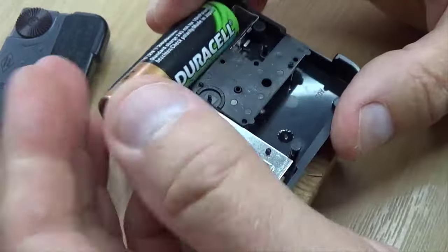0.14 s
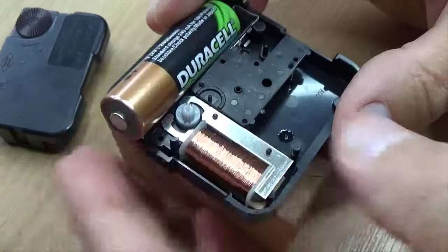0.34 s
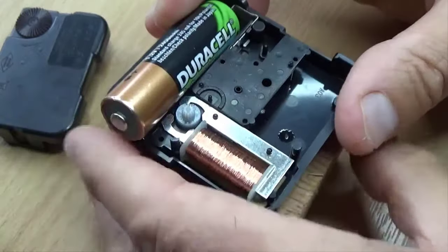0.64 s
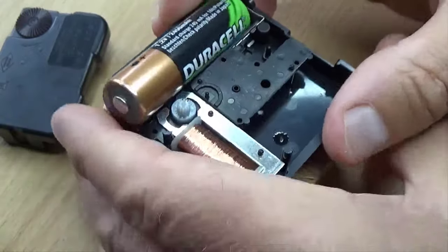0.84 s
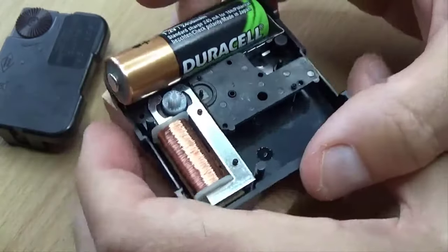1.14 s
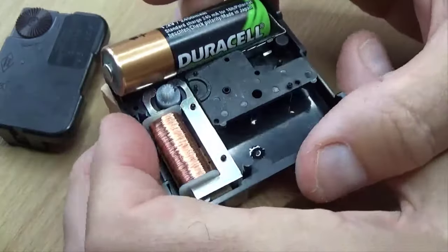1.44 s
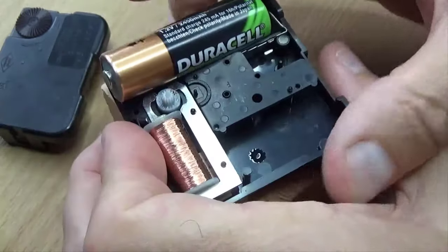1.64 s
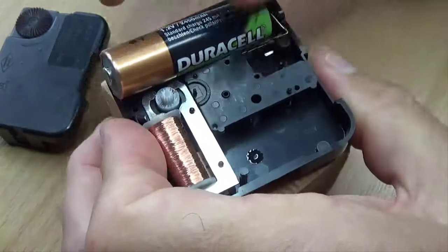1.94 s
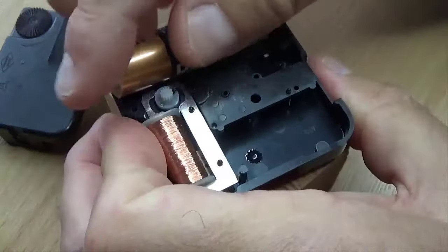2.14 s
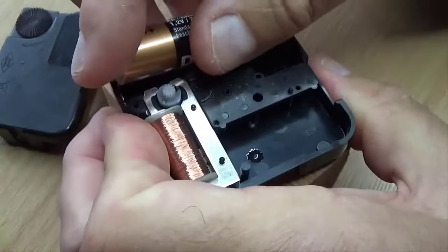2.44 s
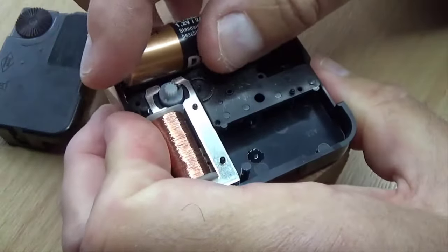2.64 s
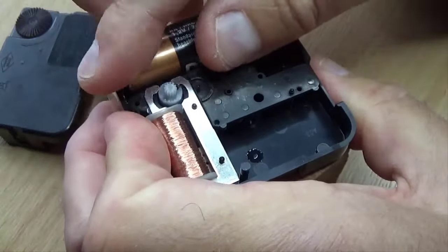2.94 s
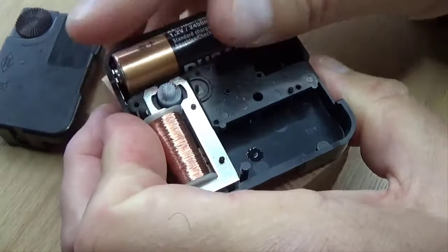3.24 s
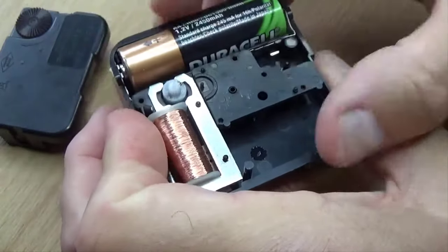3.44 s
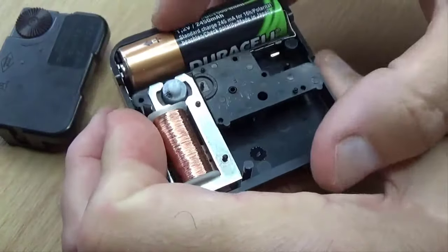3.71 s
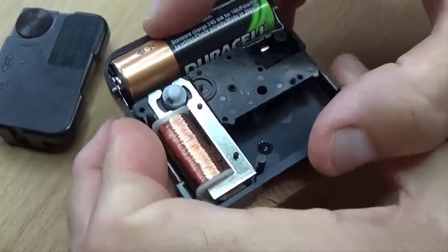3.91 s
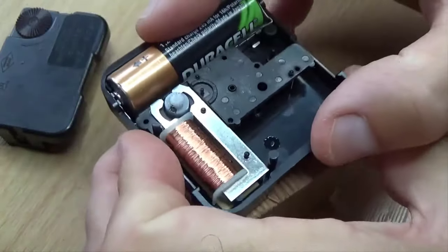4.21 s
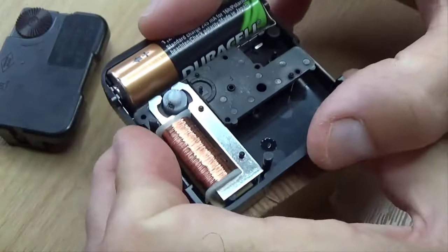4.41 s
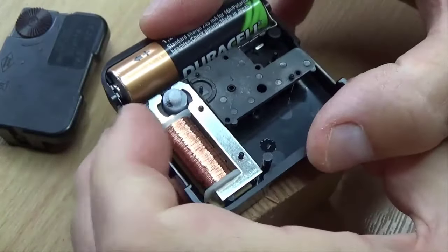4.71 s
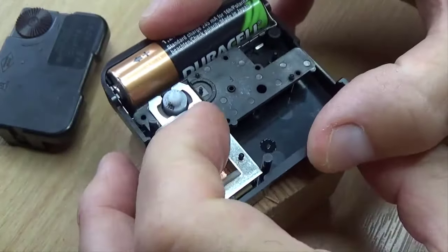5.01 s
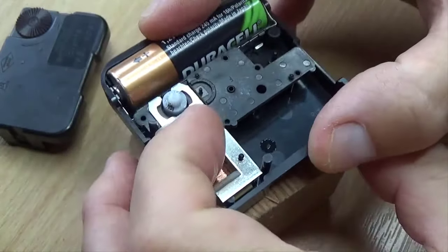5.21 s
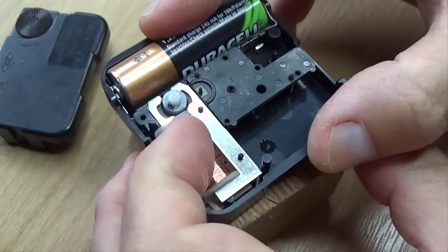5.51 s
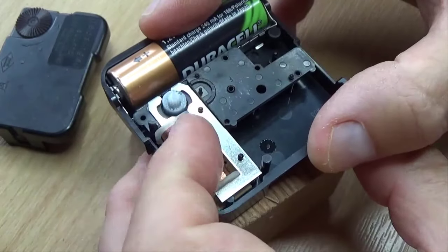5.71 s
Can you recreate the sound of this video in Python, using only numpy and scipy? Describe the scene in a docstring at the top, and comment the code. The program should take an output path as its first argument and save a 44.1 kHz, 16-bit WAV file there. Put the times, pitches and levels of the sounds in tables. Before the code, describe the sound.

A close microphone catches hands working a battery into a small plastic clock movement on a wooden desk. Within the first 0.2 s come two tight clusters of dull knuckle bumps and bright plastic snaps. Airy skin hiss and uneven case rasp continue in short strokes, with light clicks near 1.1, 1.4 and 1.6 s. Scraping and a woody drag swell towards 2 s. Then hard, brittle snaps stand out at 2.2, 2.4, 2.6 and 2.8 s, ending in a loud rapid crackle of clicks around 2.94 s as the cell seats. A soft bump and rub come near 3.5 s, then a brief low wavering groan at 3.8 and a short muffled hum just before 4 s. The rest is quiet: faint rubs, tiny taps around 4.4 s, slightly clearer clicks at 5.1 to 5.2 and 5.6 s. Short small-room reflections, steady faint hiss and a barely audible, rapid high tick lie underneath.

```python
"""Hands push a battery into the plastic holder of a small clock movement on a wooden desk, heard close.
Knuckle bumps and snaps open it; skin hiss, case rasp and desk drag (shaped noise) swell up to 2 s; the loudest
contact snaps (noise bursts ringing case and desk) fall at 2.2-3 s as the cell seats; a low groan and a one-note hum
(wavering sine, resonant noise) follow near 3.8-4 s, then lighter rubs and clicks.
Throughout, a small room answers (noise tails) over microphone hiss and a very faint high tick."""
import sys
import numpy as np
from scipy import signal
from scipy.fft import rfft, irfft, next_fast_len
from scipy.io import wavfile
from scipy.ndimage import uniform_filter1d, map_coordinates

SR = 44100
rng = np.random.default_rng(int(sys.argv[2]) if len(sys.argv) > 2 else 0)


def dump(signal):
    """Clip the signal to [-1, 1] and save it as 16-bit WAV at the path in sys.argv[1]."""
    limited = np.clip(np.atleast_2d(signal).T, -1, 1)
    pcm = np.round(limited * 32767).astype(np.int16)
    wavfile.write(sys.argv[1], SR, pcm)


N = 258408

# plastic case resonances: f/Hz, width/Hz, level/dB
CASE_MODES = [(3290, 220, -4.5), (4410, 160, 5), (5800, 790, 5.5), (9500, 400, 7.5)]
# desk top resonances: f/Hz, width/Hz, level/dB
DESK_MODES = [(121.2, 38, 0.5), (252.7, 49, 4), (300.3, 23, 2.5), (370.6, 65, 0.5), (583, 164, -5.5),
              (822, 280, -10)]
# hollows between fingers and case, per grip: from t/s, hiss f/Hz, hiss lift/dB, rasp f/Hz, rasp lift/dB
GRIP_HOLLOWS = [(0, 8700, -1.5, 2400, 5), (.67, 6340, 11, 1400, 3), (.83, 9200, 2, 2430, 3),
                (.91, 5640, 7, 2460, -3), (1.02, 9400, 2, 3200, 2.5), (1.45, 8500, 4, 2190, 10),
                (2.16, 5800, 7, 820, 10), (3.1, 6900, 3.5, 2290, 8), (3.4, 6160, 8, 2400, 7),
                (3.56, 6900, 6, 2720, 5), (3.75, 6300, 6, 2500, 4), (4.1, 9500, 2, 860, 11),
                (4.6, 4840, 10, 2650, 4), (4.75, 9700, -1, 2700, 4.5)]


def amp(db):
    """dB to linear gain."""
    return 10 ** (np.asarray(db) / 20)


def unit(x):
    """x scaled to RMS 1."""
    return x / np.sqrt(np.mean(x ** 2) + 1e-20)


def along(points, hz):
    """Interpolate (f/Hz, value) points on a log frequency axis."""
    f, v = np.transpose(points)
    return np.interp(np.log(hz + 1), np.log(f + 1), v)


def filtered(x, response):
    """x times a complex response of frequency, zero-padded."""
    n = x.shape[-1]
    padded = next_fast_len(n + 8192)
    spectrum = rfft(x, padded) * response(np.fft.rfftfreq(padded, 1 / SR))
    return irfft(spectrum, padded)[..., :n]


def modes(table):
    """Causal response of (f/Hz, width/Hz, level/dB) resonances, summed with alternating sign."""
    def response(f):
        total = 0
        for k, (centre, width, db) in enumerate(table):
            damping = 1j * f * width
            total = total + (-1) ** k * amp(db) * damping / (centre * centre - f * f + damping)
        return total
    return response


def wobble(knots_per_s):
    """Smooth random curve through Gaussian knots."""
    knots = rng.standard_normal(int(N * knots_per_s / SR) + 4)
    return map_coordinates(knots, [np.arange(N) * knots_per_s / SR])


def curves(rows):
    """One value per sample for each column after the time."""
    s, *cols = np.transpose(rows)
    return [np.interp(np.arange(N) / SR, s, c) for c in cols]


def swells(rows):
    """Gain per level column of (peak t, swell, fade, dB..) rows; overlaps add in power."""
    edge_db, roundness = 20, 1.81  # drop one swell before / one fade after the peak; 1 = pointed, 2 = round
    t = np.arange(N) / SR
    power = 0
    for s, swell, fade, *level_db in rows:
        away = np.where(t < s, (s - t) / swell, (t - s) / fade)
        shape = amp(-edge_db * np.minimum(away, 10) ** roundness)
        power = power + np.outer(amp(level_db), shape) ** 2
    return np.sqrt(power)


def spread(pair, alike):
    """Left and right from two unrelated signals, correlated per frequency as the table says."""
    def mid_side(hz):
        turn = np.arccos(np.clip(along(alike, hz), -1, 1)) / 2
        return np.array([np.cos(turn), np.sin(turn)])
    mid, side = filtered(pair, mid_side)
    return np.array([mid + side, mid - side])


def hush():
    """Room air and microphone hiss: steady stereo noise of fixed colour."""
    # hiss colour: f/Hz, relative density/dB
    colour = [(15, -13), (60, -13), (200, -6.5), (600, -11.5), (1500, -15), (11500, -24.5)]
    # left-right likeness: f/Hz, correlation
    alike = [(60, 1), (300, 0.35), (1500, 0.035), (6800, 0.67)]
    pair = filtered(rng.standard_normal((2, N)), lambda hz: amp(along(colour, hz)))
    return amp(-59.5) * unit(spread(pair, alike))


def ticking():
    """Faint high tick: Gaussian sine blips, alternately stronger and weaker, mostly on the right."""
    period_s, first_s, blip_s, tone_hz = .04, .0025, 0.0026, 3710
    t = np.arange(N) / SR - first_s
    turn = np.round(t / period_s)
    envelope = np.exp(-.5 * ((t - turn * period_s) / blip_s) ** 2)
    blip = envelope * np.sin(2 * np.pi * tone_hz * t)
    right = amp(np.where(turn % 2, -59, -65)) * blip
    return right * amp([[-8], [0]])


def room(x):
    """Wall replies as noise tails, each frequency dying at its own speed; a fresh tail every 1/8 s."""
    # decay: f/Hz, t60/s
    decay = [(100, 0.29), (700, 0.26), (3000, 0.26), (10000, 0.21)]
    # left-right likeness: f/Hz, correlation
    alike = [(100, 0.98), (400, 0.93), (1500, 0.038), (6000, 0.36), (10000, 0.65)]
    out, step = np.zeros((2, N + SR)), SR // 8
    for start in range(0, N, step):
        hz, t, z = signal.stft(rng.standard_normal((2, SR // 3)), SR, nperseg=256)
        z = z * amp(-60 * t / along(decay, hz)[:, None])
        tail = signal.istft(z, SR, nperseg=256)[1]
        tail = tail * (1 - 0.11 * np.exp(-np.arange(tail.shape[1]) / SR / 0.0008))  # slight build-up
        tail = tail / np.linalg.norm(tail[0])
        wet = signal.fftconvolve(x[None, start:start + step], tail, axes=1)
        out[:, start:start + wet.shape[1]] += wet
    return spread(out[:, :N], alike)


def groan():
    """Low tone of the case slipping on the desk, wavering in pitch and level."""
    # slides: peak t/s, swell/s, fade/s, level/dB
    slides = [(3.74, 0.0816, 0.056, -53.5), (3.82, 0.057, 0.058, -51)]
    hz = 76.6 * (1 + .06 * wobble(25))
    tone = np.sin(2 * np.pi * np.cumsum(hz) / SR)
    return np.sqrt(2) * swells(slides)[0] * amp(2.0 * wobble(30)) * tone


def friction(response, grain_db):
    """Stick-slip noise, its level wandering within milliseconds, through a body; RMS 1."""
    grain = amp(grain_db * wobble(250))
    return unit(filtered(rng.standard_normal(N) * grain, response))


def hum():
    """The sliding case hums on one note: friction through a resonance twice."""
    # slides: peak t/s, swell/s, fade/s, level/dB
    slides = [(3.79, .12, .1, -65), (3.97, 0.055, .07, -42.5)]
    note = modes([(367, 80, 0)])
    return swells(slides)[0] * friction(lambda hz: note(hz) ** 2, grain_db=-0.5)


def bumps():
    """Soft knuckle contacts push the case: a rounded force pulse leaves a dull ring."""
    # bumps: t/s, peak level/dB
    hits = [(0.0436, -32.5), (0.0624, -25), (0.0733, -28.5), (0.139, -26), (.147, -33.5), (.157, -24.5),
            (.165, -31), (3.465, -41), (5.048, -53)]
    contact_s, ring_hz, width_hz = 0.0022, 250, 130
    force, t = np.zeros(N + SR), np.arange(SR // 50) / SR
    pulse = np.sin(np.pi * np.minimum(t / contact_s, 1)) ** 2
    thump = filtered(pulse, modes([(ring_hz, width_hz, 0)]))
    for s, db in hits:
        force[round(s * SR):][:len(t)] += amp(db) * thump / abs(thump).max()
    return force[:N]


def hollow(x, pitch_hz, lift_db, width_log):
    """Lift the band each grip favours, then even the level over 25 frames."""
    hz, t, z = signal.stft(x, SR, nperseg=512)
    k = np.maximum(np.searchsorted(np.transpose(GRIP_HOLLOWS)[0], t, "right") - 1, 0)
    detune = np.log((hz[:, None] + 1) / pitch_hz[k]) / width_log
    z = z * amp(lift_db[k] * np.exp(-.5 * detune ** 2))
    power = uniform_filter1d(np.mean(abs(z) ** 2, axis=0), size=25)
    return unit(signal.istft(z / np.sqrt(power), SR, nperseg=512)[1][:N])


def hands():
    """Friction: skin hisses on the case, the case rasps, drags and thuds on the desk."""
    # hands resting and shifting: t/s, skin hiss/dB, case rasp/dB, drag/dB, low thud/dB
    holding = [(0, -58, -58.5, -57, -59), (.2, -97, -59.5, -62, -63), (.6, -48, -59, -60.5, -63.5),
               (.8, -50.5, -54, -57.5, -57), (1.2, -60, -59, -55, -64), (1.6, -58.5, -65, -62.5, -60.5),
               (2, -63, -62, -68, -75), (2.45, -62, -61, -73, -59), (3.05, -58, -78, -69, -71),
               (3.35, -80, -89, -81, -97), (3.6, -78, -58.5, -79, -66), (3.74, -68, -81, -79, -57.5),
               (3.9, -78, -87, -81, -67.5), (4.15, -89, -65, -73, -79), (4.55, -69.5, -74, -73, -93),
               (5, -77, -75, -67.5, -79), (5.86, -72.5, -69, -76, -81)]
    # finger strokes over the case: peak t/s, swell/s, fade/s, skin hiss/dB, case rasp/dB
    strokes = [(.04, 0.051, 0.12, -43, -55), (.16, 0.037, 0.028, -36.5, -44.5),
               (.32, 0.23, 0.22, -43, -50.5), (.525, 0.026, 0.017, -40.5, -67),
               (.73, 0.077, 0.059, -37.5, -56.5), (.795, 0.06, 0.062, -43.5, -50.5),
               (.955, 0.051, 0.037, -42.5, -58.5), (1.085, 0.028, 0.049, -42.5, -49.5),
               (1.14, 0.028, 0.066, -70, -53), (1.335, 0.024, 0.067, -45.5, -61),
               (1.57, 0.14, 0.15, -50, -48), (1.71, .04, 0.088, -54, -75), (1.95, 0.3, 0.2, -41, -44.5),
               (2.21, 0.44, 0.056, -45, -47), (2.32, 0.035, 0.11, -59, -55.5),
               (2.58, 0.047, 0.035, -51, -59), (2.61, 0.019, 0.068, -32.5, -47.5),
               (2.791, 0.0037, 0.0066, -36, -36), (2.922, 0.014, 0.02, -52, -48),
               (3.13, 0.031, 0.067, -51, -54.5), (3.21, 0.015, 0.021, -49, -57),
               (3.46, 0.049, 0.036, -45.5, -52.5), (3.61, 0.046, 0.061, -47, -53),
               (3.94, 0.14, 0.25, -53.5, -59.5), (4.27, 0.047, 0.016, -61, -82),
               (4.685, 0.044, 0.005, -47.5, -61), (4.9, 0.23, 0.23, -56, -60),
               (5.145, 0.018, 0.025, -70, -51.5), (5.42, 0.073, 0.023, -61.5, -71)]
    # case shoved along the desk: peak t/s, swell/s, fade/s, level/dB
    shoves = [(0, .05, 0.063, -45.5), (.2, 0.071, 0.052, -56), (.8, 0.11, 0.056, -49.5),
              (1.56, 0.24, 0.17, -47), (1.84, .09, 0.12, -41.5), (1.96, 0.27, 0.39, -36.5),
              (2.55, 0.1, 0.33, -55), (3.48, .02, 0.035, -49.5), (3.97, 0.081, 0.086, -49.5)]
    # skin hiss colour: f/Hz, relative density/dB
    skin_colour = [(2000, -14.5), (3500, -11), (5400, -11), (8500, -4.5), (11500, -8)]
    # case rasp colour: f/Hz, relative density/dB
    rasp_colour = [(400, -13.5), (800, -5.5), (1500, -6), (2700, -8.5), (5000, -11), (7000, -27.5)]
    rest_hiss, rest_rasp, rest_drag, thud_gain = amp(curves(holding))
    stroke_hiss, stroke_rasp = swells(strokes)
    shove = swells(shoves)[0]
    _, hiss_hz, hiss_lift_db, rasp_hz, rasp_lift_db = np.transpose(GRIP_HOLLOWS)

    def skin(hz):
        return amp(along(skin_colour, hz)) * (1 + 0.26 * abs(modes(CASE_MODES)(hz)))  # case colours the rub

    hiss = hollow(friction(skin, grain_db=2.0), hiss_hz, hiss_lift_db, width_log=.045)
    rasp = friction(lambda hz: amp(along(rasp_colour, hz)), grain_db=2.0)
    rasp = hollow(rasp, rasp_hz, rasp_lift_db, width_log=0.099)
    drag = friction(modes(DESK_MODES[1:]), grain_db=2.5)
    thud = friction(modes([(87.0, 93, 0)]), grain_db=7.5)
    rubbing = np.hypot(rest_hiss, stroke_hiss) * hiss + np.hypot(rest_rasp, stroke_rasp) * rasp
    return rubbing + np.hypot(rest_drag, shove) * drag + thud_gain * thud


def snaps():
    """Short swells of micro-impacts ring the case and push the desk: (heard near, sent to the walls)."""
    # contacts: t/s, bright peak level/dB, ring f/Hz; relative to bright: ring/dB, desk knock/dB, mid body/dB
    contacts = [(0.041, -28.5, 6300, -5, -22, -7), (0.0632, -22.5, 9000, 6, -23, -27),
                (0.07, -29.5, 7300, 8, -12, -1), (0.0744, -26.5, 9220, 10, -24, -4),
                (0.135, -31.5, 1450, -4, -13, -15), (0.154, -19.5, 1440, -7, -8.5, -46),
                (0.157, -21, 8460, 4, -11.5, -25), (0.162, -19.5, 8000, -2, -13.5, -28),
                (0.168, -20, 6000, -2, -15, -11), (1.0808, -36, 2010, -0.5, -25, -3),
                (1.1035, -22.5, 1520, -6, -22, -15), (1.148, -45, 836, 6.5, -7, -9),
                (1.3991, -26, 9100, 1, -7.5, -8), (1.6329, -30.5, 2070, -20.5, -19, -2),
                (2.1923, -9, 5040, -4, -23.5, -47), (2.3383, -28.5, 1730, -2, -23, -19),
                (2.4382, -15.5, 9780, 4, -15.5, 0.5), (2.592, -5.5, 9700, -2.5, -26.5, -9.5),
                (2.6147, -19.5, 6400, -1, -20, -34), (2.7937, -35.5, 3600, 2, 7, -7),
                (2.7993, -14, 6250, -2.5, -21.5, -17), (2.9087, -36, 4000, 2.5, -34, -15),
                (2.9328, -10.5, 5800, -18, -20, -4.5), (2.936, -5.5, 4730, -6, -60, -5.5),
                (2.939, -11.5, 3520, -0.5, -30, -17), (2.9412, -6.5, 5770, -9, -50, -22),
                (2.9436, -14.5, 8600, -8, -21, -13), (2.9562, -16.5, 6700, -6, -18.5, -32),
                (3.1768, -39.5, 2330, -2.5, -20, -31), (3.4653, -38, 650, -3, -8, -3),
                (3.6721, -44, 2470, -8, -4.5, -5), (4.2305, -46.5, 1240, -4, -5, 3),
                (4.3908, -40.5, 900, -12, -8, 6.5), (4.4182, -40.5, 1150, -12, -9, 7),
                (4.489, -49, 2500, -10, -6, 1), (4.509, -47.5, 9350, 3, -4, 1.5),
                (4.529, -44.5, 1980, -15.5, -1, 0), (4.958, -40.5, 1600, -4, -13, -7),
                (5.141, -32.5, 2300, -8, -21, -18), (5.219, -35, 4850, 2, -28, -3),
                (5.6205, -28, 6050, 2, -24, -6)]
    near, far, t = np.zeros(N + SR), np.zeros(N + SR), np.arange(SR // 8) / SR
    knock = filtered(np.exp(-t / 0.00044), modes(DESK_MODES))
    # the whole case gives alike to every blow, 1/1500 s late
    body_mode = modes([(1550, 1400, 0)])
    tap = filtered(t * np.exp(-t / 0.00006), lambda f: body_mode(f) ** 2)
    tap = np.roll(tap, SR // 1500)
    swell = t * np.exp(-(t / 0.0011) ** 1.26)
    even = filtered(t == 0, lambda f: f * f / (f * f + 3000 ** 2))
    for s, db, hz, ring_db, knock_db, body_db in contacts:
        burst = rng.standard_normal((2, len(t))) * swell
        bright = filtered(burst[0], lambda f: 0.97 * f / (f + 2500) + modes(CASE_MODES)(f))
        ring = filtered(burst[1], modes([(hz, 0.1 * hz, 0)]))  # the struck spot has its own pitch
        parts = [(0, bright), (ring_db, ring), (body_db, tap), (knock_db, knock)]
        bright, ring, body, push = [amp(db + part_db) * part / abs(part).max() for part_db, part in parts]
        start, treble = round(s * SR), bright + ring
        near[start:][:len(t)] += treble + body + push
        # treble modes beam in different directions: walls get their sum, evener in colour
        even_treble = even * np.linalg.norm(treble) / np.linalg.norm(even)
        far[start:][:len(t)] += 0.61 * treble + 0.78 * even_treble + 0.45 * body + push
    return near[:N], far[:N]


def scene():
    """Direct sound slightly right, room reply to rubs and snaps, hiss and tick."""
    # low rings that linger after a snap: f/Hz, width/Hz, level/dB
    room_modes = [(125, 12, 11), (350, 64, 6), (480, 70, 8.5), (800, 130, 16)]
    rubs = hands() + hum() + bumps() + groan()
    clicks, scattered = snaps()
    near = (rubs + clicks) * amp([[-.2], [.2]])
    lingering = filtered(scattered, lambda f: 1 + abs(modes(room_modes)(f)))
    reply = room(amp(-3) * rubs + amp(-8.5) * lingering)
    return near + reply + hush() + ticking()


def record(dry):
    """Band limit: only a trace passes above the knee, nothing from the top up."""
    knee_hz, top_hz, trace_db = 11050, 16600, -44
    return filtered(dry, lambda hz: np.where(hz < knee_hz, 1, amp(trace_db)) * (hz < top_hz))


dry = scene()
out = record(dry)
dump(out)
```